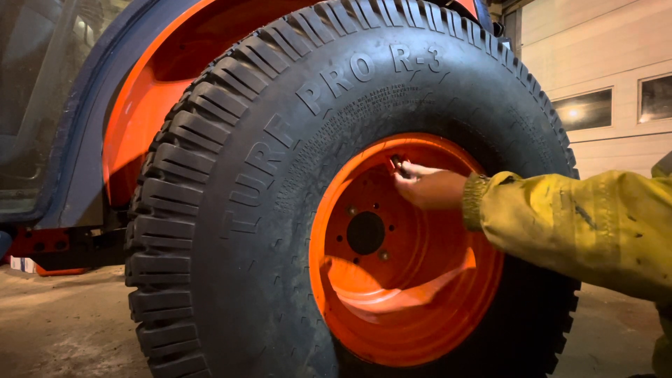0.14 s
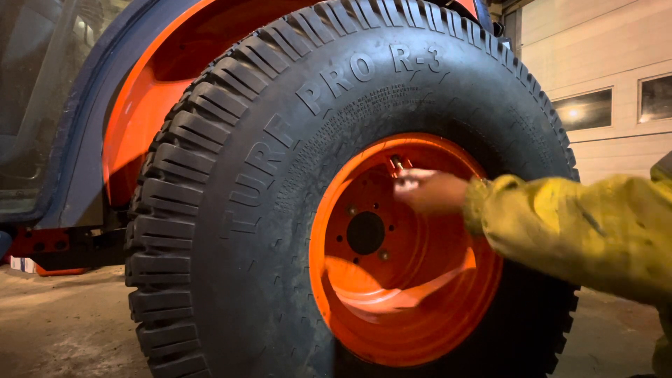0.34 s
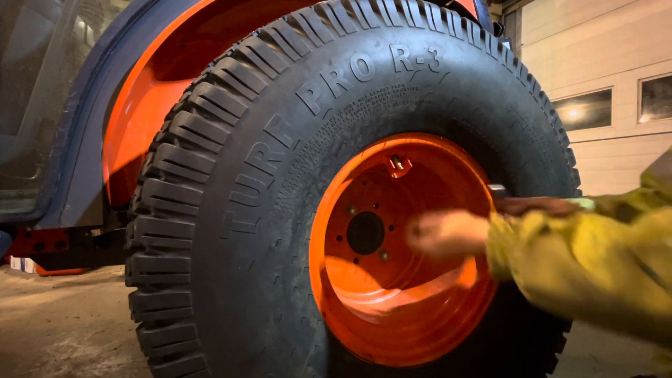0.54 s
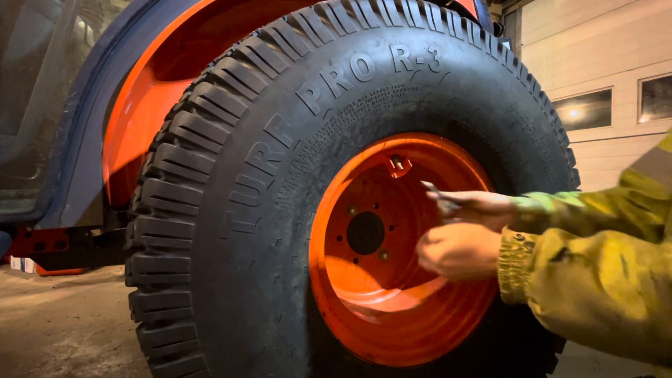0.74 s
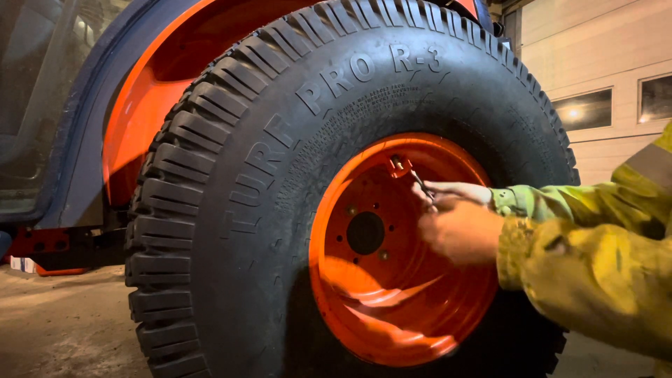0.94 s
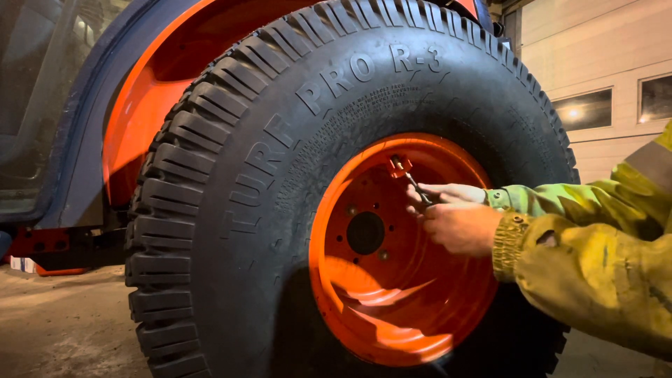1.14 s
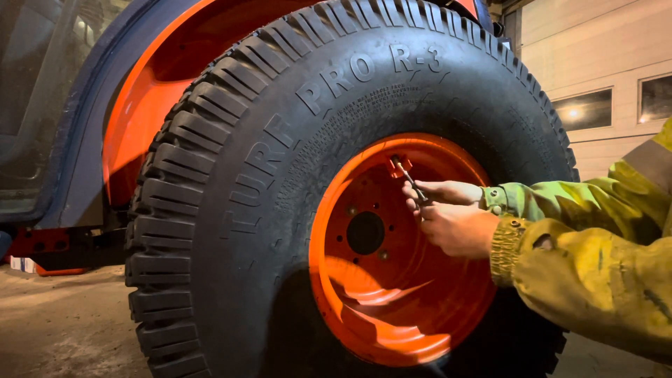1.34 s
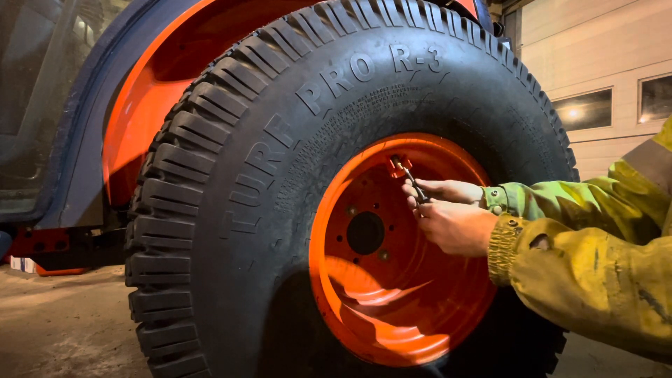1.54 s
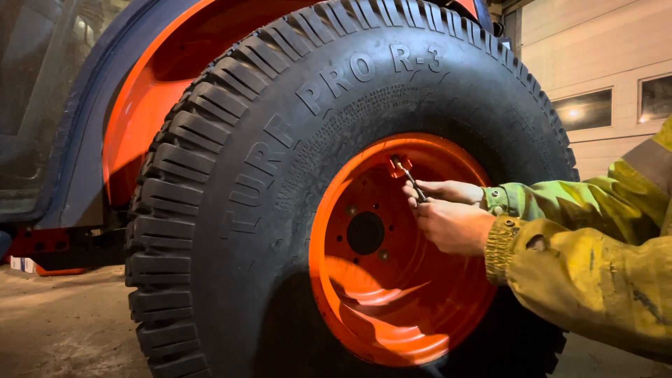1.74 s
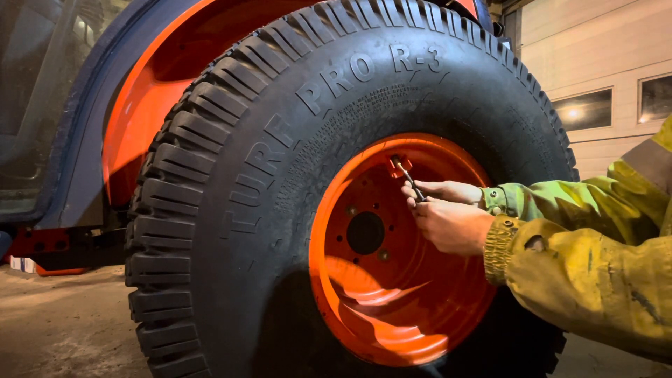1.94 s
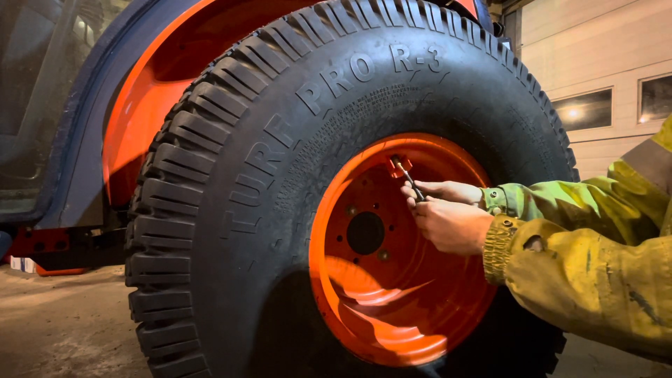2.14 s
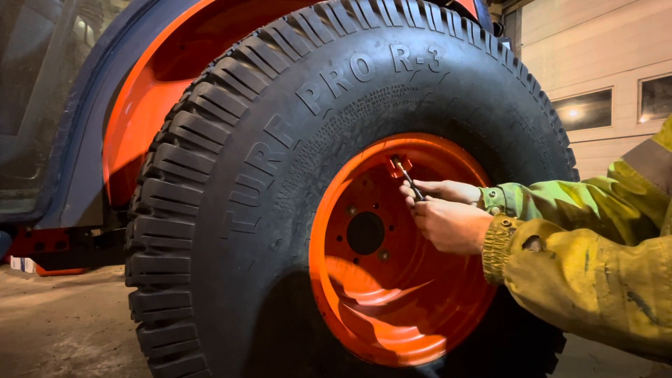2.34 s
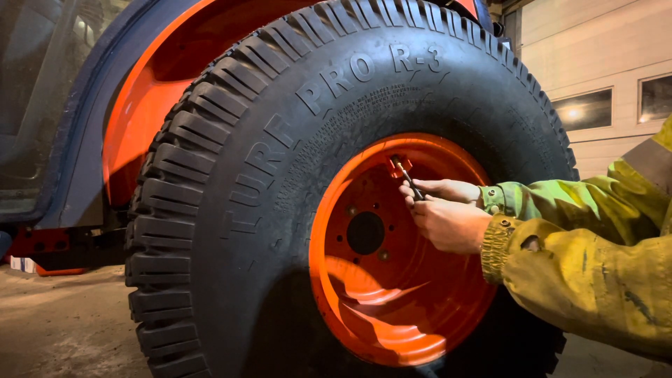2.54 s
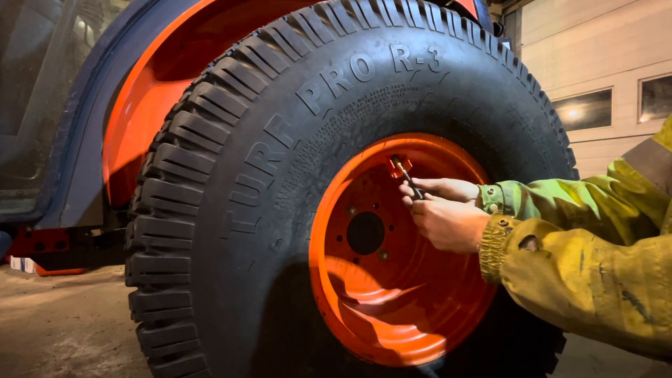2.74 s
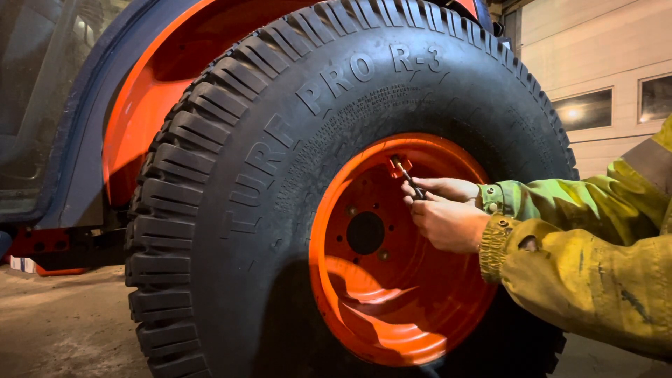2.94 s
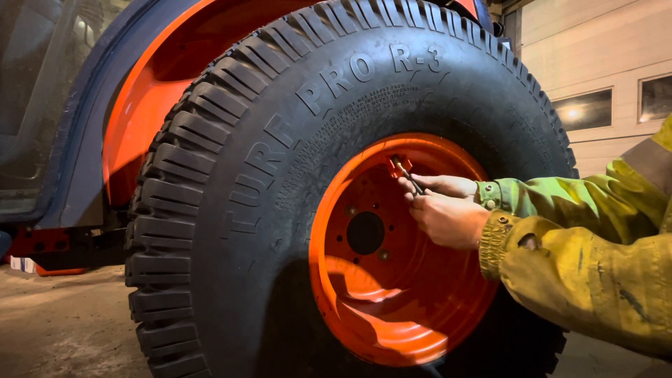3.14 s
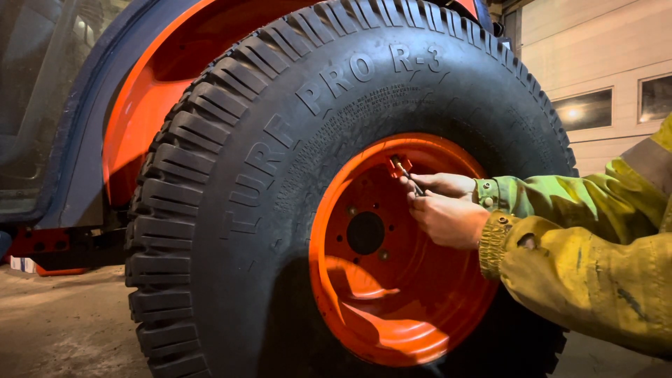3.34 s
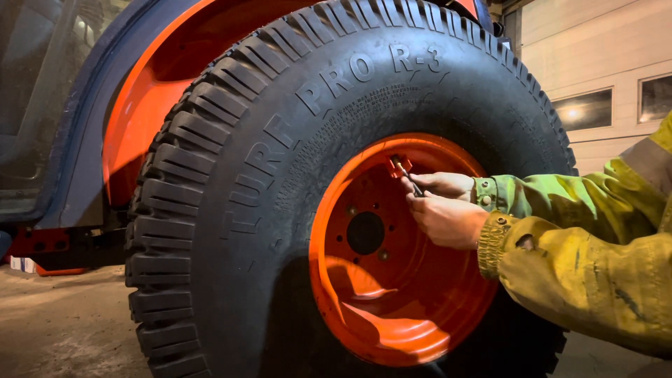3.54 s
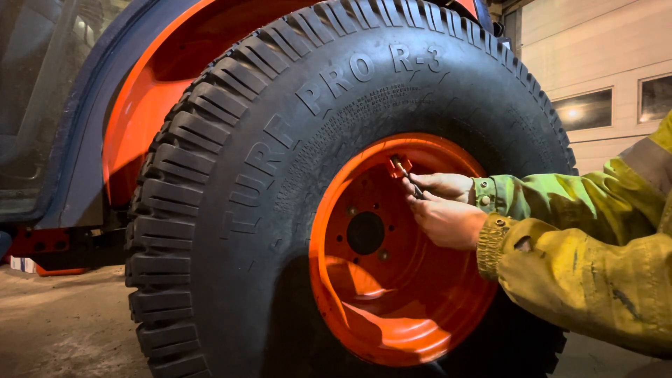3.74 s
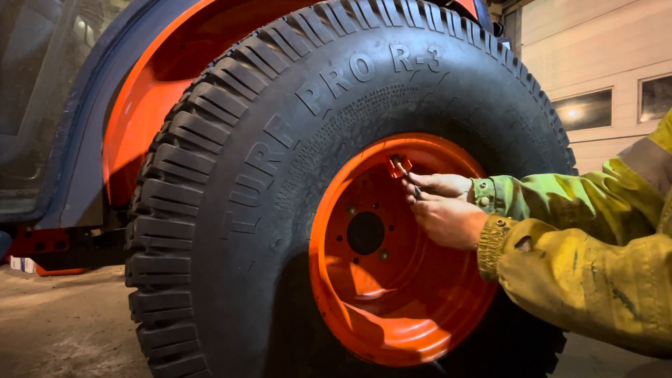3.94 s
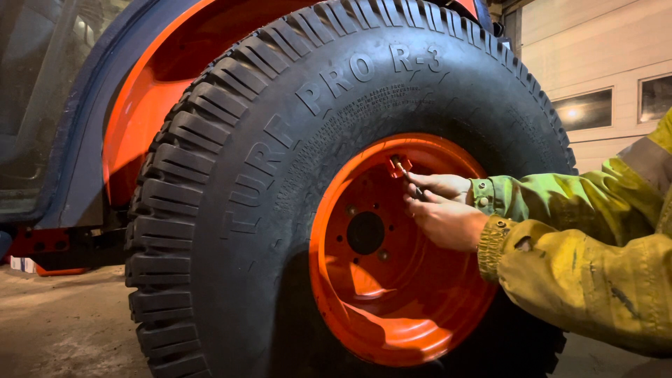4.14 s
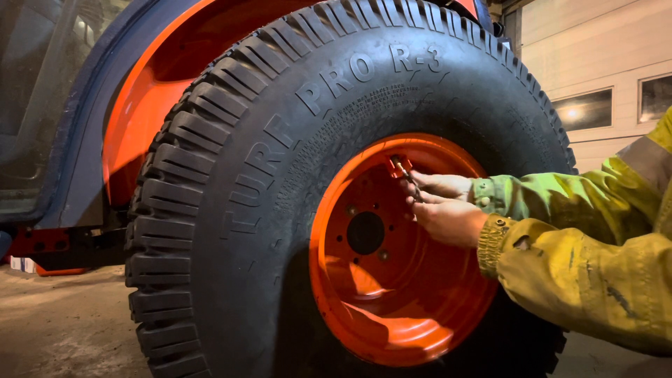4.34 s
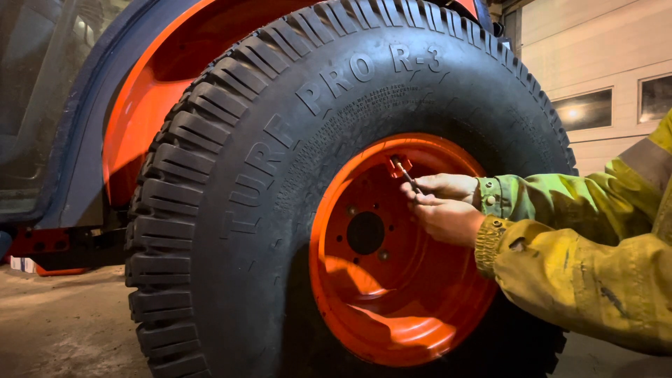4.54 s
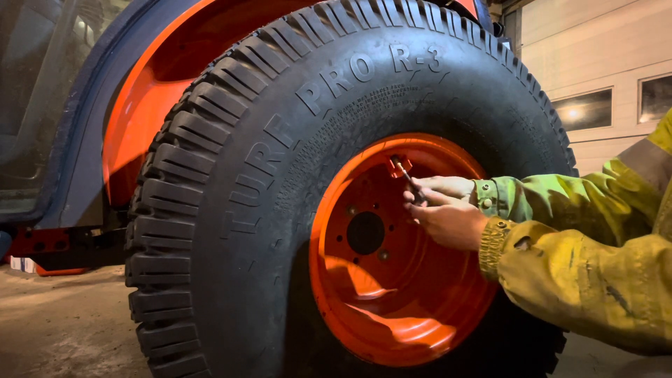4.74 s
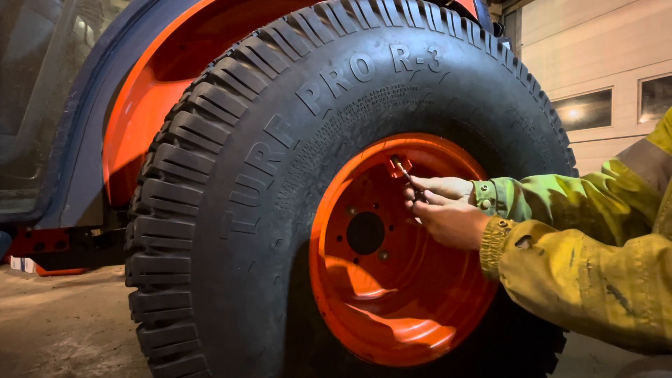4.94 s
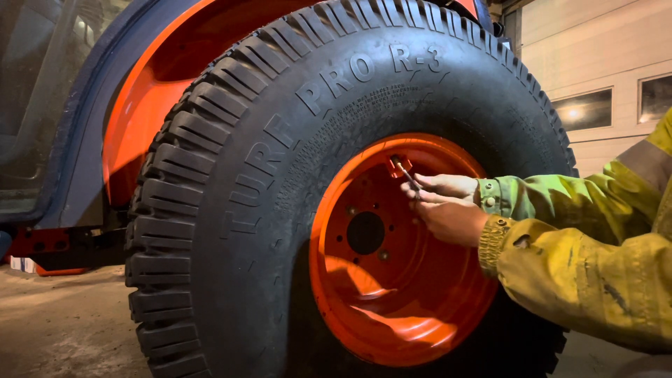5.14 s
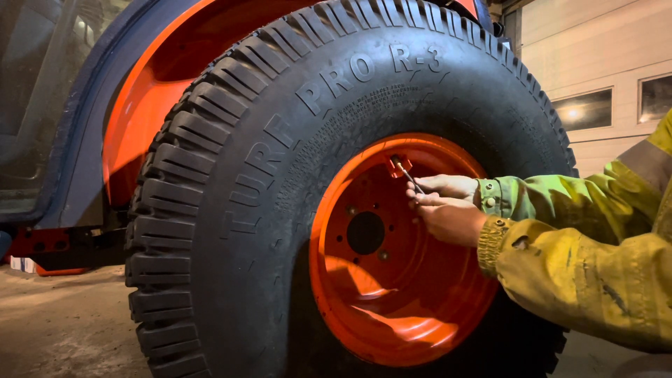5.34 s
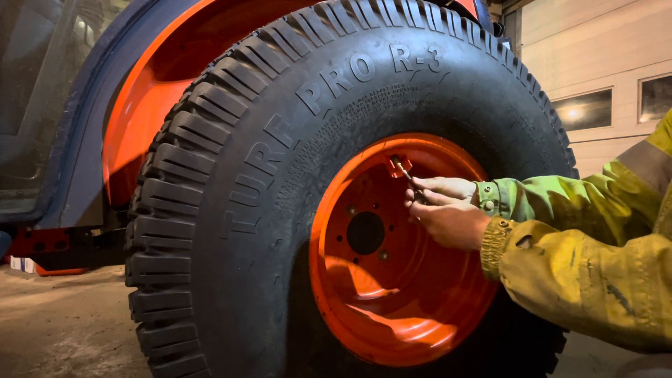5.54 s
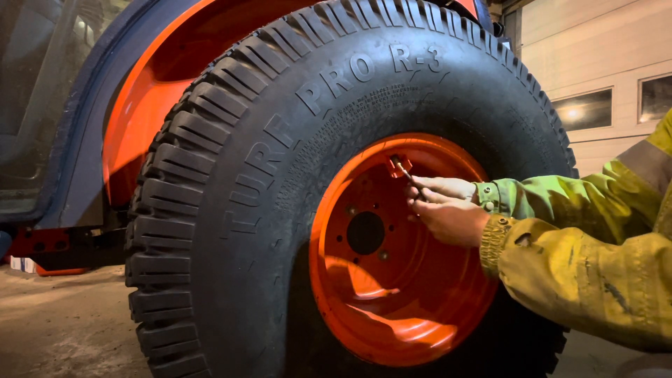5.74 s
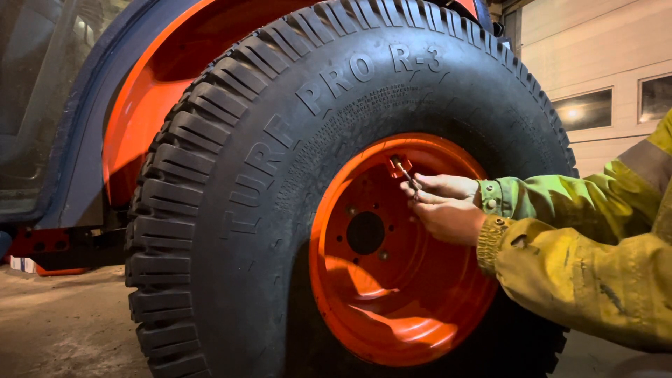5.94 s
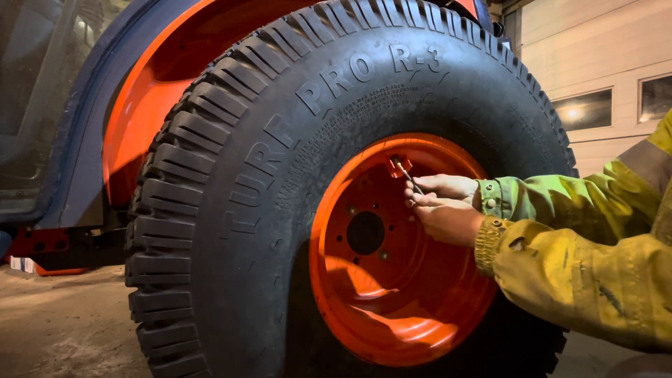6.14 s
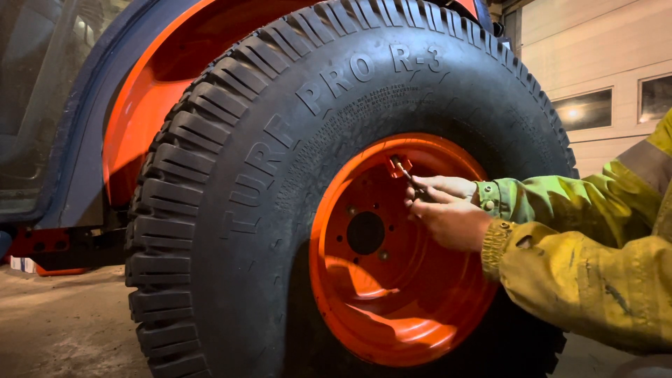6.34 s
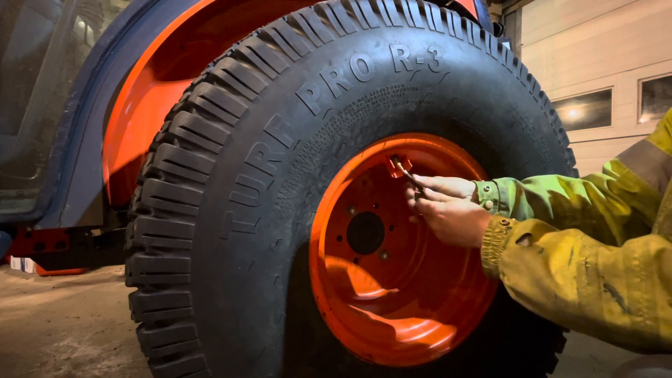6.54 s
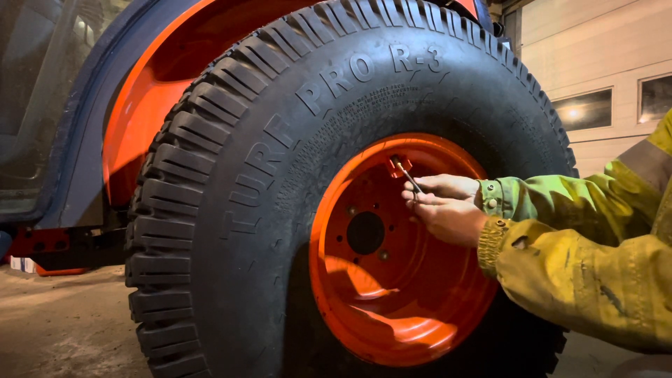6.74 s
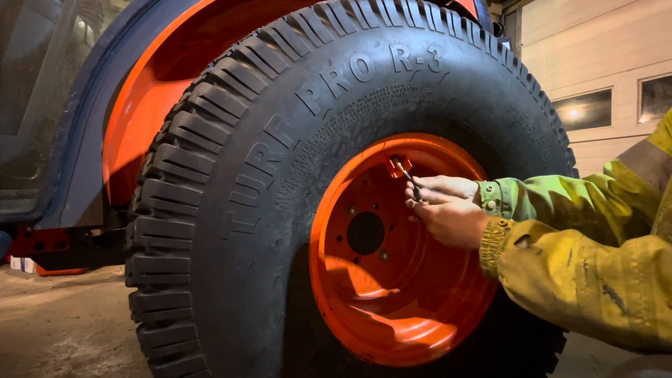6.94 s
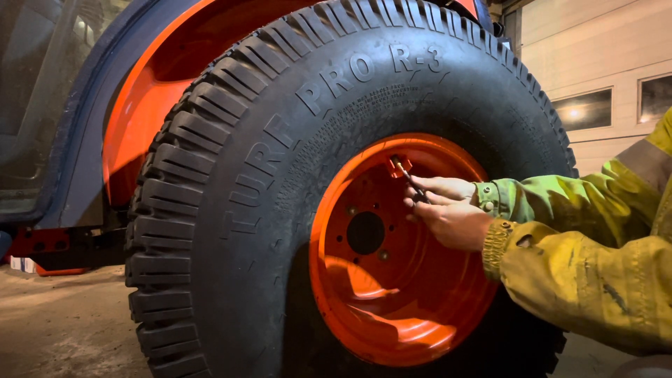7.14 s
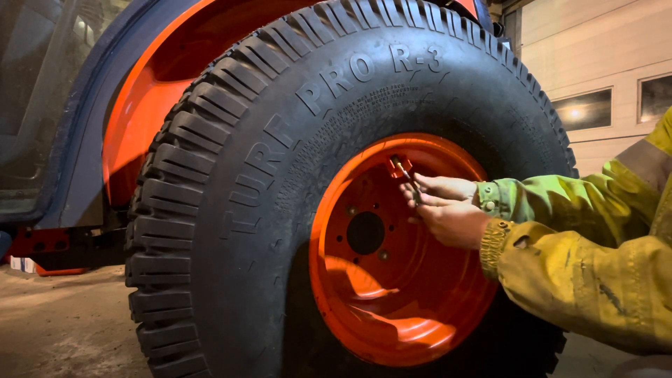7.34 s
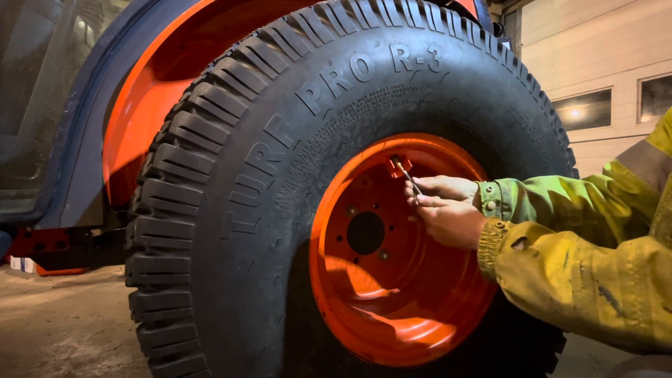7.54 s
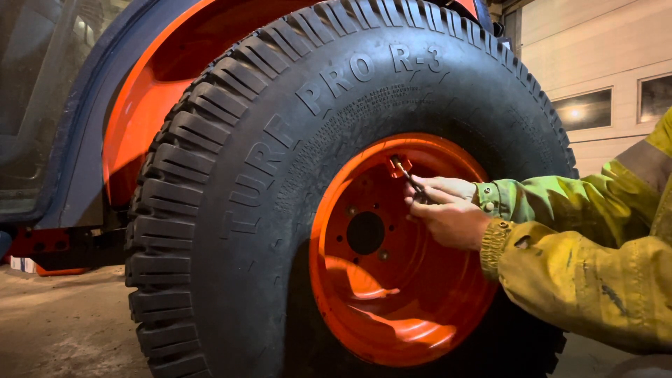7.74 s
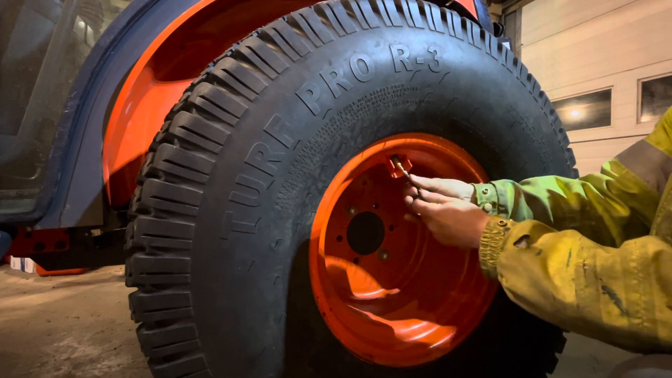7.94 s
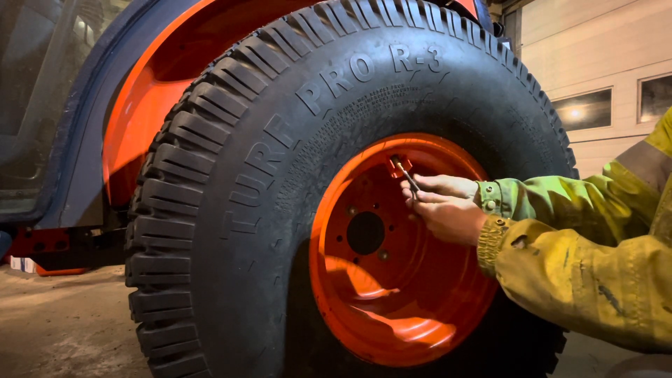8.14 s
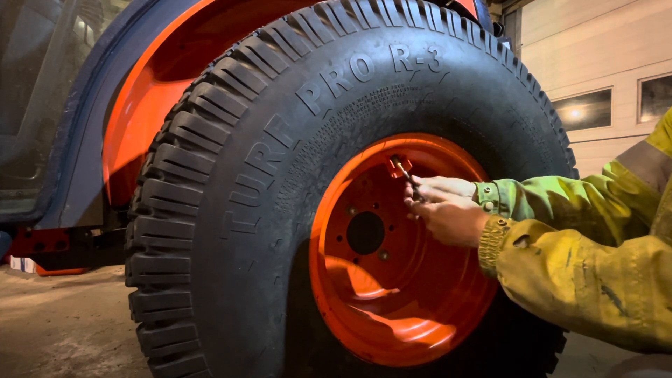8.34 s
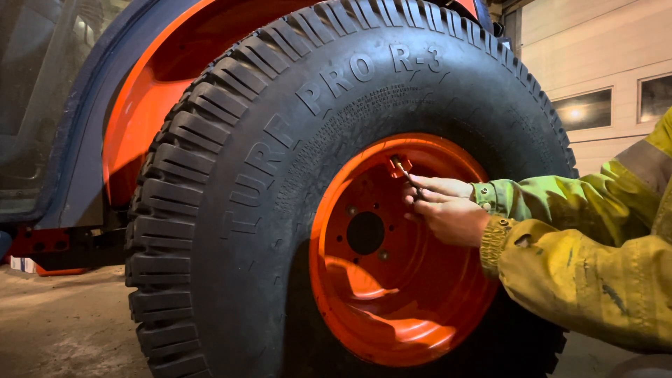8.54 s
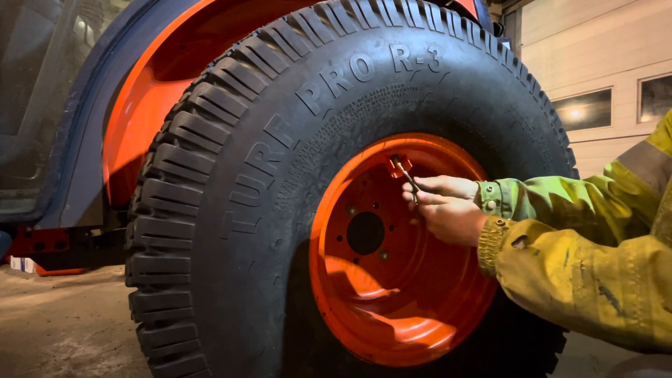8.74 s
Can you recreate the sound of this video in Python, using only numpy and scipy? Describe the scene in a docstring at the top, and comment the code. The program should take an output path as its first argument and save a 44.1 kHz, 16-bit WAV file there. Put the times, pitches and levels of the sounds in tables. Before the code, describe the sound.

Close beside a large tyre outdoors, a stiff jacket sleeve swishes and a small metal tool taps the valve, with short ringing clinks from the steel wheel. At about three seconds the valve pin is pressed and loud, bright air rushes out, roughened by fingers and sizzling on the tool. The hiss dips sharply twice, then returns, weakening at the very end. Low outdoor rumble, a faint hum and a distant engine lie underneath.

```python
"""A jacket sleeve swishes and a small tool clinks on a tractor tyre's valve, ringing the steel wheel.
Then the valve pin is pressed in: air hisses out into the dish of the wheel, as noise coloured by resonances.
The jet roars on the fingers and sizzles on the tool, and drops sharply twice as the pin slips.
Cloth is shaped noise, clinks are dying sine waves with short noise bursts, bumps of the hands are soft tones.
Below lie outdoor rumble and faint machine noise, and a hum and a far engine made of sine waves."""
import sys
import numpy as np
from scipy import signal
from scipy.fft import rfft, irfft
from scipy.io import wavfile

SR = 44100
rng = np.random.default_rng(int(sys.argv[2]) if len(sys.argv) > 2 else 0)


def pcm_store(signal):
    """Save signal as 16-bit PCM."""
    levels = np.round(np.clip(np.atleast_2d(signal), -1, 1) * 32767)
    wavfile.write(sys.argv[1], SR, levels.astype(np.int16).T)


N = 391608
TIME, FREQ = np.arange(N) / SR, np.fft.rfftfreq(N, 1 / SR)


def amp(db):
    """Turns decibels into gain: +20 dB is ten times the amplitude."""
    return 10 ** (np.asarray(db) / 20)


def unit(x):
    """Scales a sound to rms 1."""
    return x / np.sqrt(np.mean(x ** 2) + 1e-20)


def read(points, hz=FREQ):
    """Reads a table over frequency, joining its points on a logarithmic axis."""
    f, value = np.transpose(points)
    return np.interp(np.log(hz + 1), np.log(f + 1), value)


def follow(rows):
    """Reads the columns of a table over time at every sample."""
    t, *columns = np.transpose(rows)
    return [np.interp(TIME, t, column) for column in columns]


def add(mix, s, sound):
    """Mixes a sound in at time s, cutting it off at the end."""
    part = mix[..., round(s * SR):][..., :sound.shape[-1]]
    part += sound[..., :part.shape[-1]]


def wander(rate_hz):
    """Slow random drift of rms 1, with little movement faster than the given rate."""
    return unit(irfft(rfft(rng.standard_normal(N)) / (1 + (FREQ / rate_hz) ** 4), N))


def bell(middle_s, length_s):
    """A smooth swell that rises to 1 and falls away evenly."""
    return np.exp(-(2 * (TIME - middle_s) / length_s) ** 2)


def peak(hz, width):
    """A resonance over frequency: 1 at its centre, half of that at the edges of its width."""
    return 1 / (1 + (2 * (FREQ - hz) / width) ** 2)


def lift(resonances):
    """Adds up resonances, or dips where negative, as dB over frequency."""
    return sum(db * peak(hz, width) for hz, width, db in resonances)


def noise_pair(same):
    """Spectra of left and right noise; same = 1 makes them identical, 0 independent."""
    a, b = rfft(rng.standard_normal((2, N)))
    same = np.clip(same, -1, 1)
    return np.array([a, same * a + np.sqrt(1 - same ** 2) * b])


def in_band(z, band):
    """Turns a stereo spectrum into sound whose left-right average has rms 1 within the band."""
    inside = (FREQ > band[0]) & (FREQ < band[1])
    return irfft(z, N) / np.std(irfft(z.mean(0) * inside, N))


def echoes(t60, channels=2):
    """Dense reflections of total energy 1, dying by 60 dB in t60 seconds, different for each ear."""
    t = np.arange(SR // 2) / SR
    taps = rng.standard_normal((channels, len(t))) * amp(-60 * t / t60) * (t > .002)
    return taps / np.linalg.norm(taps, axis=1, keepdims=True)


# left-right phase of the hiss: [f/Hz, phase of left minus right/rad]
STEREO_PHASE = [(3000, 0), (5050, 0), (5500, -2.7), (6100, -2.6), (6500, -.9), (7300, -1), (8000, .8),
                (8500, .7), (9100, 2.2), (9900, .9), (11200, 0), (12900, -.2), (13300, -2.2),
                (13900, -3.14)]
# left-right level of the hiss: [f/Hz, level of left minus right/dB]
STEREO_LEVEL = [(100, -1), (380, -3), (700, -.5), (2400, .5), (4000, 0), (5600, 3), (6800, 2), (8000, 0),
                (8600, -4.5), (9600, -5), (11200, 0)]


def stereo_shape():
    """Gives the hiss its left-right level and phase; the top treble is in opposite phase and sounds wide."""
    level = amp(read(STEREO_LEVEL) * np.array([[.5], [-.5]]))
    return level * np.exp(1j * read(STEREO_PHASE) * np.array([[0], [-1]]))


# colours of the five noises, before path and levels; each: [f/Hz, level/dB per Hz]
JET_SPECTRUM = [(150, -21.5), (300, -21.5), (1200, -36.5), (3000, -20), (3700, -18.5), (5500, -9.5),
                (7000, -4), (8200, 0.5), (9300, 1), (11000, -4), (12000, -5.5), (12700, -8.5)]  # the free jet
SIZZLE_SPECTRUM = [(500, -31), (2300, -12.5), (3000, -3.5), (3600, -4), (4600, -0.5), (5700, 1.5),
                   (6200, 1.5), (7000, 3.5), (8500, -4), (14000, -22)]  # the jet on the edge of the tool
ROAR_SPECTRUM = [(300, -23), (800, -21), (1200, -2.5), (1420, -3), (1580, 0.5), (1850, 0.5), (2500, 4.5),
                 (3300, 1), (3700, 0), (4600, -5.5), (8000, -13), (15000, -38)]  # the jet on the fingers
RUSH_SPECTRUM = [(100, -6), (200, -5), (265, 3), (450, 3), (600, 2.5), (900, -4), (1300, 3.5), (2200, -2),
                 (6000, -52)]  # slowed air through the cupped hands
HOLLOW_SPECTRUM = [(300, -16), (650, -7), (900, -3), (1150, -8), (1400, -4.5), (2200, -24)]  # the hollow between the hands
# edge tones of the jet on the tool: [f/Hz, width/Hz, lift/dB]
TOOL_EDGE_TONES = [(4660, 240, 0.5), (5390, 44, 9), (6060, 120, 3.5), (7980, 190, 5)]
# air resonances in the dish of the wheel, before dish_depth: [f/Hz, width/Hz, lift/dB]
DISH_RESONANCES = [(311, 130, 9), (450, 24, 6.5), (630, 106, 9.5), (891, 156, 15.5), (1010, 49, 0.5),
                   (1253, 160, 5.5), (1507, 90, 7), (1600, 110, 1.5), (1660, 46, 7), (2020, 91, 8.5),
                   (2190, 120, -5), (2346, 110, 6), (2570, 110, -3.5), (2730, 93, 6), (3900, 150, 3.5),
                   (4330, 92, 4.5), (5230, 150, -2.5), (6090, 69, 7), (6550, 280, 2), (6920, 100, 1),
                   (7170, 190, -1), (8180, 98, 2.5), (8380, 100, -0.5), (10000, 390, 1.5), (11130, 490, 2),
                   (12140, 490, 4)]
# how alike the noise is left and right, before the left-right phase: [f/Hz, coherence 0-1]
HISS_ALIKE = [(100, .8), (1500, .78), (3000, .7), (4400, .72), (5100, .3), (6150, .55), (7500, .3),
              (9200, .3), (10200, .55), (11200, .99), (12700, .99), (13200, .55), (13900, .995)]
# lift of the top treble: [f/Hz, lift/dB]
TREBLE_LIFT = [(12900, 0), (13900, 1), (15000, 5), (15600, 6.5)]
# strength of the jet with the valve open, before its tremor: [t/s, level/dB]
FLOW_CURVE = [(2.97, -33.5), (3.15, -33.5), (3.31, -36.5), (3.5, -36), (3.71, -33), (4.1, -33.5),
              (4.66, -33), (4.72, -31), (5.05, -31.5), (5.37, -32.5), (5.5, -30.5), (5.79, -31),
              (6.08, -34), (6.64, -34.5), (6.76, -33), (7.09, -36.5), (7.43, -31.5), (7.59, -35.5),
              (7.8, -31.5), (7.97, -33), (8.27, -33.5), (8.36, -30), (8.45, -33.5), (8.85, -33.5)]
# gusts, with levels relative to the jet before each noise's own trim
# the jet grazes the edge of the tool and sizzles: [start t/s, length/s, level/dB]
TOOL_GRAZES = [(3.08, 0.12, -4), (5.11, 0.058, -4.5), (5.45, 1, -7.5), (6.16, 0.37, -4.5),
               (6.24, 0.047, -5), (6.74, 0.28, -7.5), (7.005, 0.12, 4.5), (7.14, 0.14, -5.5),
               (7.42, 0.54, -3.5), (8.0, 0.32, -11.5), (8.32, 0.025, -3), (8.44, 0.27, -6)]
# the jet strikes the fingers: [start t/s, length/s, roar level/dB, rush level/dB]
FINGER_SPLASHES = [(2.987, 0.25, 3.5, -9), (3.224, 0.3, -0.5, -4), (3.752, 0.2, -17, -13.5),
                   (3.845, 0.047, -18, -23), (3.9, 0.046, -30, -14.5), (4.298, 0.065, -19, -12),
                   (4.346, 0.14, -3.5, -19), (4.596, 0.07, -16, -9.5), (4.685, 0.034, -6.5, -33),
                   (4.993, 0.055, -13, -15.5), (5.105, 0.28, -5, -14), (5.378, 0.038, -1.5, -15),
                   (5.734, 0.033, -33, -17.5), (5.907, 0.032, -12, -18), (6.133, 0.12, -9, -20),
                   (6.845, 0.034, -25, -18.5), (6.973, 0.072, -3.5, -15), (7.09, 0.12, -9.5, -19),
                   (7.49, 0.18, -3.5, -18), (7.728, 0.1, -3, -18), (8.325, 0.11, -8, -18.5),
                   (8.445, 0.11, -10.5, -19.5), (8.553, 0.042, -9.5, -20), (8.675, 0.049, -4.5, -23),
                   (8.786, 0.035, -30, -12.5)]
# the hollow between the hands sounds: [start t/s, length/s, level/dB]
HAND_HOLLOWS = [(3.0, 0.34, -11), (3.4, 0.2, -12.5), (3.77, 0.07, -21), (3.93, 0.39, -19),
                (7.5, 0.23, -18.5), (8.57, 0.026, -16), (8.69, 0.035, -18), (8.8, .03, -16)]
# what is left of each between its gusts, on the same scale as the gusts
SIZZLE_DB, ROAR_DB, RUSH_DB, HOLLOW_DB = -10, -15.5, -23, -34
RUSH_ATTACK_S = 0.043  # the slowed air builds up more gently


def valve(ripple=0.46, ripple_t60=0.041, dish_depth=0.78, tremor_db=0.66, tremor_hz=14, choke=0.34):
    """Five turbulent noises fed by one flow, coloured by the wheel dish and combed by close reflections."""
    same = read(HISS_ALIKE)
    combs = abs(1 + ripple * rfft(echoes(ripple_t60), N))
    # the reflections are alike on both sides where the noise is
    comb = same ** 2 * combs[0] + (1 - same ** 2) * combs
    path = amp(dish_depth * lift(DISH_RESONANCES) + read(TREBLE_LIFT)) * comb * stereo_shape()

    def turbulence(colour_db, band, level_db, flutter_db, flutter_hz):
        """One noise whose strength flutters as the jet flaps."""
        sound = in_band(noise_pair(same) * path * amp(colour_db), band)
        return sound * amp(level_db + flutter_db * wander(flutter_hz))

    # each noise is levelled within its own band in Hz
    jet = turbulence(read(JET_SPECTRUM), (8000, 13000), level_db=0.0, flutter_db=0.12, flutter_hz=60)
    sizzle_colour = read(SIZZLE_SPECTRUM) + lift(TOOL_EDGE_TONES)
    sizzle = turbulence(sizzle_colour, (4400, 6800), level_db=-1.17, flutter_db=1.0, flutter_hz=38.8)
    roar = turbulence(read(ROAR_SPECTRUM), (1400, 3600), level_db=-0.67, flutter_db=0.5, flutter_hz=45)
    rush = turbulence(read(RUSH_SPECTRUM), (240, 1000), level_db=-1.0, flutter_db=0.47, flutter_hz=28)
    hollow = turbulence(read(HOLLOW_SPECTRUM), (700, 1400), level_db=1.0, flutter_db=2.0, flutter_hz=30)

    sizzle *= gusts(TOOL_GRAZES, SIZZLE_DB)
    roar *= gusts([(s, length, db) for s, length, db, _ in FINGER_SPLASHES], ROAR_DB)
    rush *= gusts([(s, length, db) for s, length, _, db in FINGER_SPLASHES], RUSH_DB, RUSH_ATTACK_S)
    hollow *= gusts(HAND_HOLLOWS, HOLLOW_DB)

    gap = opening()
    # roar, rush and hollow weaken more than the rest when the valve chokes
    slowed_air = (roar + rush + hollow) * gap ** choke
    flow_db, = follow(FLOW_CURVE)
    return (jet + sizzle + slowed_air) * gap * amp(flow_db + tremor_db * wander(tremor_hz))


# the pin is held down, then slips back and leaves a leak: [start t/s, end t/s, leak level/dB re open]
PIN_PRESSES = [(2.963, 5.797, -10.5), (5.871, 7.292, -13), (7.376, 8.838, -5.5)]
# the pin lifts a little and pinches the flow: [middle t/s, length/s, depth/dB]
PIN_PINCHES = [(5.085, 0.039, -4), (6.014, 0.083, -2.5), (7.83, 0.16, -4), (8.062, 0.084, -4),
               (8.293, 0.051, -3.5), (8.392, 0.079, -2.5), (8.77, 0.036, -3.5)]
OPEN_S, CLOSE_S = 0.034, 0.047  # times for full pin travel; a leak stops the closing early


def opening():
    """How far the valve is open, 0-1: the pressed pin opens it, and a slip leaves only a leak."""
    gap = np.zeros(N)
    for start, end, leak_db in PIN_PRESSES:
        down = np.clip((TIME - start) / OPEN_S, 0, 1)
        held = np.clip(1 - (TIME - end) / CLOSE_S, amp(leak_db), 1)
        gap = (1 - down) * gap + down * held
    pinch_db = sum(db * bell(s, length) for s, length, db in PIN_PINCHES)
    return gap * amp(pinch_db)


GUST_ATTACK_S, GUST_SAG_DB_PER_S, GUST_RELEASE_S = 0.031, 6, 0.06


def gusts(rows, rest_db, attack_s=GUST_ATTACK_S):
    """Gain of a noise that flares when the jet meets something: attack, sagging hold, release."""
    power = amp(rest_db) ** 2
    for start, length, db in rows:
        t = TIME - start
        attack = np.clip(t / attack_s, 0, 1)
        hold = amp(db - GUST_SAG_DB_PER_S * np.clip(t, 0, length))
        release = np.exp(-np.maximum(t - length, 0) / GUST_RELEASE_S)
        power = power + (attack * hold * release) ** 2
    return np.sqrt(power)


def past_hands(x, patchy_db=1.65):
    """As hands and aim shift, single bands of the hiss swell and fade, each in its own time."""
    size, frames, bins = 1024, 30, 4  # samples per frame; half-widths of a patch in time and frequency
    overlap = size - size // 4
    z = signal.stft(x, nperseg=size, noverlap=overlap)[2]
    blur = np.outer(np.hanning(2 * bins), np.hanning(2 * frames))
    patches = signal.fftconvolve(rng.standard_normal(z.shape[1:]), blur, "same")
    gain = unit(amp(patchy_db * unit(patches)))
    return signal.istft(z * gain, nperseg=size, noverlap=overlap)[1][:, :N]


# the jet sings on an edge or gap, before waver and valve opening; rows past the end stay silent:
# [start t/s, length/s, f/Hz, width/Hz, level/dB]
JET_WHISTLES = [(3.01, .3, 1530, 200, -38.5), (3.3, 0.2, 1620, 120, -47), (2.99, 0.16, 3590, 80, -48),
                (6.2, 0.19, 8200, 110, -47), (7.01, 0.18, 6800, 84, -32), (8.9, .13, 4800, 84, -36.5),
                (7.015, 0.066, 4300, 350, -37), (5.39, 0.046, 3600, 640, -42), (6.7, .17, 8440, 140, -40),
                (8.07, 0.28, 7800, 140, -36.5), (9.9, 0.048, 6300, 260, -31)]


def whistles(waver_db=1.5):
    """Edge tones: turbulence in one narrow resonance, alive only while the jet holds its aim."""
    noise = noise_pair(read(HISS_ALIKE)) * stereo_shape()
    out = np.zeros((2, N))
    for s, length, hz, width, db in JET_WHISTLES:
        tone = unit(irfft(noise * peak(hz, width), N))
        out += tone * gusts([(s, length, db)], -np.inf)
    return out * opening() * amp(waver_db * wander(15))


# the tool touches the valve; level is before level_db, the next three are relative to it before their trims:
# [t/s, level/dB, dull knock level/dB, bright tick level/dB, lower modes level/dB, ring length factor]
TOOL_TOUCHES = [(0.122, -62.5, -5, 15, -5, .6), (0.624, -60, 19, -10, 3, .3),
                (0.935, -46, 15.5, 0, -2, 0.63), (1.408, -40.5, 4.5, -7, 2, 0.83),
                (1.4986, -34, -3, -7, 0, 0.86), (1.526, -45, -16, 5, -1, .9), (1.6935, -49, -6, -14, 0, .9),
                (1.7163, -56, 4, -9, 5, 0.57), (1.8307, -31.5, -3, 0, -7.5, 1.1),
                (2.03, -47.5, 4, -14, 3, 0.54), (2.1097, -45, 1, -12, -1, .9), (2.1621, -37, 0, -2, 0, .95),
                (2.2548, -54, 1, 2, 0, .7), (2.272, -52, 5, -8, 2, 0.77), (2.3232, -42.5, -6, 4, 10, 0.69),
                (2.337, -42, 10, 6, 3, 0.89), (2.566, -52, 10, -4, -3, .8), (2.946, -48, -5, -1.5, 1, .6)]
# what the steel wheel rings with, before each touch varies it: [f/Hz, level/dB, time to fall 60 dB/s]
WHEEL_MODES = [(390, -6, 0.13), (620, -19, 0.41), (760, -27, 0.72), (1025, -10, 0.12), (1080, -4, 0.086),
               (1255, -4, .09), (1360, -3, 0.12), (1635, -5.5, 0.2), (1707, 4, 0.18), (2070, 2, 0.22),
               (2130, -2.5, 0.16), (2400, -11, .09), (2750, -16, 0.08), (3070, -20, 0.048),
               (3640, -18, 0.042), (4080, -20, 0.032)]
# the bright part of a touch: [f/Hz, level/dB per Hz]
TICK_SPECTRUM = [(500, -36), (1200, 20), (2200, 11), (4000, 1.5), (7000, -15), (13000, -24), (14500, -43)]
# the dull part of a touch: [f/Hz, level/dB per Hz]
KNOCK_SPECTRUM = [(100, -23), (300, 10), (550, -4.5), (1100, 5), (1900, -5), (3000, -36), (8000, -45)]
CHATTER_S, CHATTER_DB = 0.011, -9  # mean time between bounces, level change per bounce


def tool(tick_t60=0.033, tick_db=-7.5, knock_t60=0.069, knock_db=-7, wet_db=-6, level_db=-4,
         scatter_db=2.5, detune=0.0057, contact_s=0.0013):
    """A touch is a knock, a tick and the wheel's ring, with tiny bounces, thrown back by the garage front."""
    t, out = np.arange(SR // 2) / SR, np.zeros(N)
    onset = 1 - np.exp(-t / contact_s)
    hz, db, t60 = np.transpose(WHEEL_MODES)[:, :, None]

    def burst(colour, t60):
        """Many heavily damped modes, too dense to tell apart: a dying noise."""
        gain = amp(read(colour, np.fft.rfftfreq(len(t), 1 / SR)))
        return unit(irfft(rfft(rng.standard_normal(len(t))) * gain, len(t))) * amp(-60 * t / t60)

    for s, peak_db, dull_db, bright_db, lower_db, ring_length in TOOL_TOUCHES:
        knock = burst(KNOCK_SPECTRUM, knock_t60)
        add(out, s, amp(peak_db + level_db + knock_db + dull_db) * knock * onset)
        for bounce, wait in enumerate(CHATTER_S * (.5 + rng.random(size=3))):
            # spot and grip change with each contact
            strength, phase, grip = rng.standard_normal((3, len(WHEEL_MODES), 1))
            mode_db = db + lower_db * (hz < 1900) + scatter_db * strength
            decay_db = -60 * t / (t60 * ring_length)
            modes = amp(mode_db + decay_db) * np.sin(2 * np.pi * (hz * (1 + detune * grip) * t + phase))
            ring = modes.sum(0)
            tick = amp(tick_db + bright_db) * burst(TICK_SPECTRUM, tick_t60)
            contact = (ring / abs(ring).max() + tick) * onset
            add(out, s, amp(peak_db + level_db + CHATTER_DB * bounce) * contact)
            s = s + wait
    garage = echoes(t60=0.26)
    return out + amp(wet_db) * signal.fftconvolve(out[None], garage, axes=1)[:, :N]


# the tool scrapes along the valve thread, before the slips: [start t/s, level/dB, length/s]
THREAD_SCRAPES = [(1.487, -71, 0.078), (2.243, -78, 0.025), (2.31, -80, 0.045)]
# colour of the scrape: [f/Hz, level/dB per Hz]
SCRAPE_SPECTRUM = [(1500, -10), (2800, -15), (4400, -12), (5150, 3), (5700, -8), (6500, -16), (11000, -24),
                   (12800, -17), (14000, -28)]


def scrape(slip_db=2.5):
    """Tiny slips of metal on metal under a short stroke: bright noise of uneven strength."""
    stroke = np.zeros(N)
    for s, db, length in THREAD_SCRAPES:
        add(stroke, s, amp(db) * np.sin(np.linspace(0, np.pi, round(length * SR))))
    noise = in_band(noise_pair(0.37) * amp(read(SCRAPE_SPECTRUM)), (4000, 7000))
    return noise * stroke * amp(slip_db * wander(200))


# strokes of the sleeve, before level_db and grain: [fastest moment t/s, level/dB, swell/s, fade/s]
SLEEVE_STROKES = [(.14, -71, 0.024, 0.045), (.43, -65.5, 0.076, 0.15), (.64, -57.5, 0.14, 0.21),
                  (.96, -67, 0.12, 0.069), (1.262, -69.5, 0.23, 0.056), (2.65, -77, 0.25, .03)]
# colour of the rubbing cloth: [f/Hz, level/dB per Hz]
SLEEVE_SPECTRUM = [(100, 9), (400, 12), (1000, 9), (1800, 4), (3000, 2), (5000, -0.5), (7000, -1),
                   (9500, 2), (12500, -8), (15000, -22)]
SLEEVE_REST_DB = -85.5  # the arm is never quite still; before level_db and grain


def sleeve(level_db=-1, grain_db=0.8):
    """Stiff cloth rubs on cloth, with a fine grain; each stroke swells and fades."""
    rub = in_band(noise_pair(0.085) * amp(read(SLEEVE_SPECTRUM)), (3000, 13000))
    power = amp(SLEEVE_REST_DB) ** 2
    for s, db, swell, fade in SLEEVE_STROKES:
        stroke = amp(db) * np.exp(-np.maximum((s - TIME) / swell, (TIME - s) / fade))
        power = power + stroke ** 2
    return rub * np.sqrt(power) * amp(level_db + grain_db * wander(100))


# the cuffs rasp over each other: [middle t/s, length/s, level/dB]
CUFF_RASPS = [(0.172, 0.09, -77), (0.424, 0.15, -77), (0.725, 0.18, -68), (1.225, .2, -70.5)]
# colour of the rasp: [f/Hz, level/dB per Hz]
RASP_SPECTRUM = [(500, -14), (1200, 1), (2000, 5), (3200, -10), (5000, -14), (12000, -28)]


def rasp(catch_db=2.5, catch_hz=120):
    """Coarse weave catches and lets go in uneven grains."""
    swell = sum(amp(db) * bell(s, length) for s, length, db in CUFF_RASPS)
    noise = in_band(noise_pair(0.39) * amp(read(RASP_SPECTRUM)), (1000, 4000))
    return noise * swell * unit(amp(catch_db * wander(catch_hz)))


# the jacket folds with a low murmur, before the crumple: [middle t/s, length/s, level/dB]
JACKET_FOLDS = [(.63, 0.07, -67), (0.983, 0.12, -62.5), (1.3, 0.12, -73), (2.5, 0.36, -66.5),
                (2.793, 0.3, -79)]
# colour of the folding cloth: [f/Hz, level/dB per Hz]
FOLD_SPECTRUM = [(100, -22), (200, 7), (300, 6), (420, 3), (700, -39), (2000, -56)]


def folds(crumple_db=2.0):
    """Heavy cloth bends in soft, uneven swells of low noise."""
    swell = sum(amp(db) * bell(s, length) for s, length, db in JACKET_FOLDS)
    noise = in_band(noise_pair(0.8) * amp(read(FOLD_SPECTRUM)), (150, 600))
    return noise * swell * amp(crumple_db * wander(25))


# soft bumps of the hands on the wheel; pitch is nominal and sags: [start t/s, level/dB, f/Hz, length/s]
HAND_BUMPS = [(0.19, -57, 221, 0.034), (0.926, -54.5, 300, 0.064), (4.42, -47, 138.6, 0.15),
              (7.35, -47.5, 257, 0.025), (7.36, -50, 172, 0.095), (7.37, -48.5, 108, 0.084)]


def hands():
    """Dull, soft-edged bumps whose pitch sags from 1.1 to 0.76 times the nominal one."""
    out = np.zeros(N)
    for s, db, hz, length in HAND_BUMPS:
        u = np.linspace(0, 1, round(length * SR))
        cycles = hz * length * (1.1 * u - 0.17 * u ** 2)
        add(out, s, amp(db) * np.sin(np.pi * u) * np.sin(2 * np.pi * cycles))
    return out


# a far engine, before its drift and the tilt in outdoors(): [t/s, firing f/Hz, level/dB]
ENGINE_CURVE = [(0, 49.4, -75), (.9, 48.9, -75), (1.3, 48.9, -72), (2.2, 47.83, -56), (3.2, 48.56, -53),
                (4.1, 49.3, -53), (4.6, 49.4, -48.5), (5.4, 50.54, -48), (5.75, 53.3, -49), (5.9, 51, -57),
                (6.3, 48.6, -78)]


def engine(second_db=-12, third_db=-20):
    """A far engine speeds up and lets off: its firing rate with two weaker harmonics."""
    firing_hz, engine_db = follow(ENGINE_CURVE)
    turn = 2 * np.pi * np.cumsum(firing_hz) / SR
    second = amp(second_db) * np.sin(2 * turn)
    third = amp(third_db) * np.sin(np.pi + 3 * turn)
    return unit(np.sin(turn) + second + third) * amp(engine_db + 1.4 * wander(6.3))


def hum():
    """A low hum: one sine near 59.4 Hz, wavering slightly in pitch and level."""
    tone = np.sin(2 * np.pi * np.cumsum(59.4 + 0.39 * wander(2.1)) / SR)
    return amp(-57.5 + 1.2 * wander(6.2)) * unit(tone)


# outdoor background: [f/Hz, level/dB per Hz]
AIR_SPECTRUM = [(24, -44), (45, 4), (70, 3), (130, -4), (250, -16), (550, -19.5), (730, -19.5),
                (900, -23.5), (1400, -31.5), (3000, -47), (6500, -49), (9800, -41), (12000, -56),
                (15000, -56)]
# how alike it is left and right: [f/Hz, coherence 0-1]
AIR_ALIKE = [(60, 0.91), (130, 0.68), (290, 0.23), (640, 0.025), (15000, 0.067)]


def air():
    """Steady outdoor rumble: mostly low noise, wide in the upper range."""
    return amp(-56.5) * unit(irfft(noise_pair(read(AIR_ALIKE)) * amp(read(AIR_SPECTRUM)), N))


def outdoors():
    """Rumble, hum and far engine together, slightly stronger on the right."""
    return (air() + hum() + engine()) * amp([[-.6], [.6]])


# a faint, rough machine tone far away: [t/s, level/dB]
WHINE_CURVE = [(.1, -70), (.7, -76), (1.1, -75), (1.8, -72), (2.2, -63.5), (2.5, -82), (8.8, -80)]


def whine():
    """A narrow band of distant machine noise around 710 Hz that comes and goes."""
    level_db, = follow(WHINE_CURVE)
    return unit(irfft(noise_pair(0.14) * peak(710, width=64), N)) * amp(level_db)


def scene():
    """Air, tool, cloth and hands at the wheel, over the background."""
    at_valve = past_hands(valve()) + whistles() + tool() + scrape()
    person = sleeve() + rasp() + folds() + hands()
    return at_valve + person + outdoors() + whine()


def record(dry):
    """A steep low-pass filter removes what lies above about 15750 Hz."""
    low_pass = signal.firwin(511, 15750, window=("kaiser", 9), fs=SR)
    return signal.oaconvolve(dry, low_pass[None], "same")


dry = scene()
out = record(dry)
pcm_store(out)
```